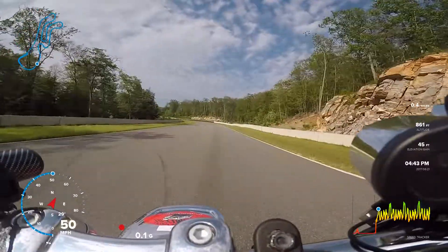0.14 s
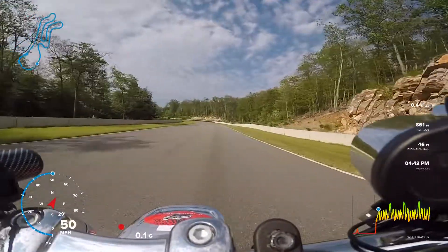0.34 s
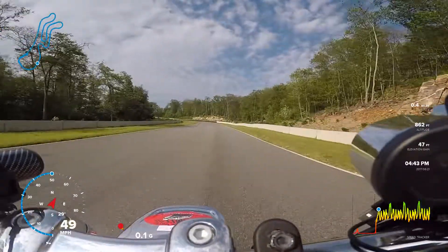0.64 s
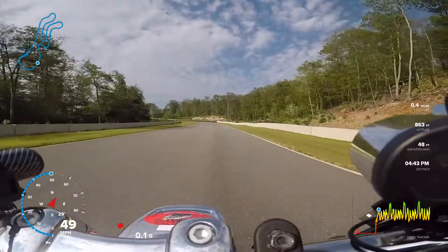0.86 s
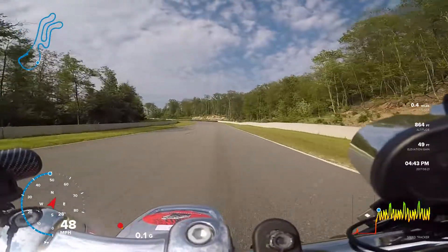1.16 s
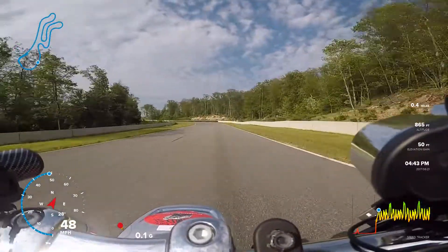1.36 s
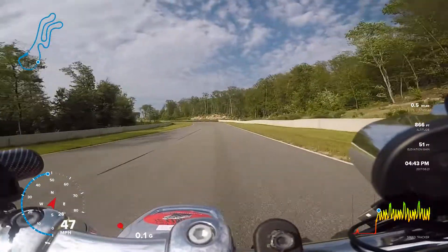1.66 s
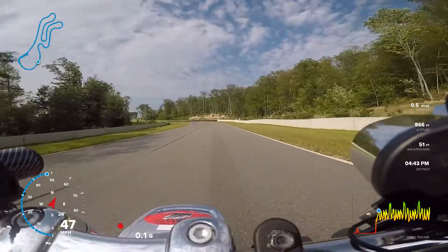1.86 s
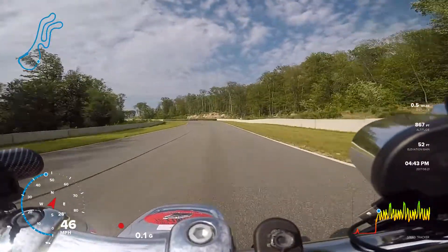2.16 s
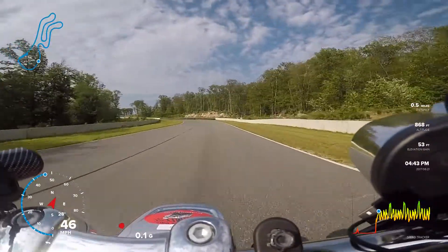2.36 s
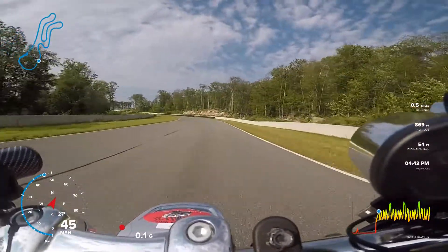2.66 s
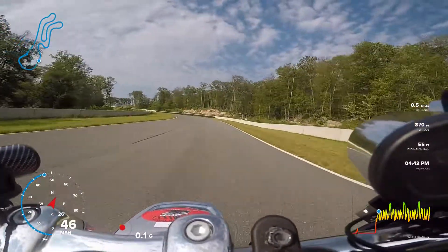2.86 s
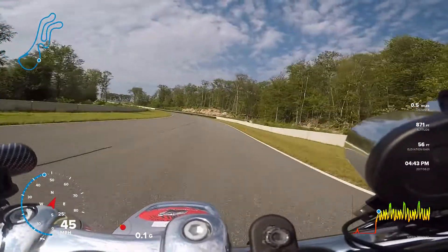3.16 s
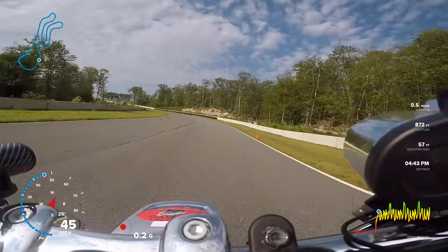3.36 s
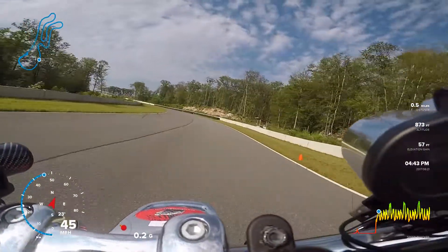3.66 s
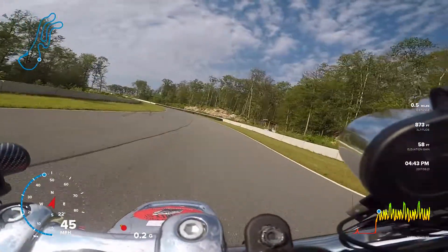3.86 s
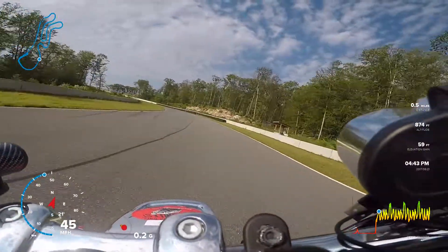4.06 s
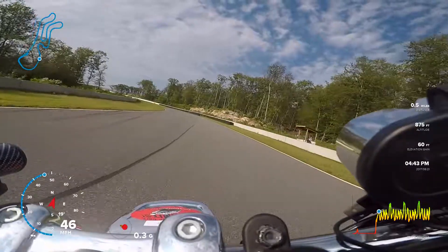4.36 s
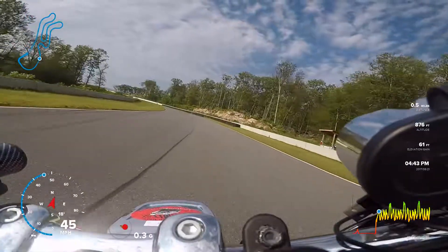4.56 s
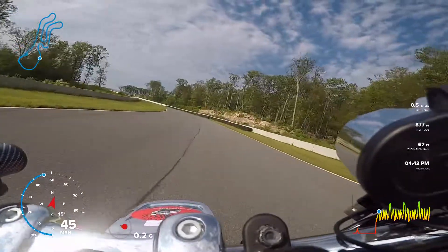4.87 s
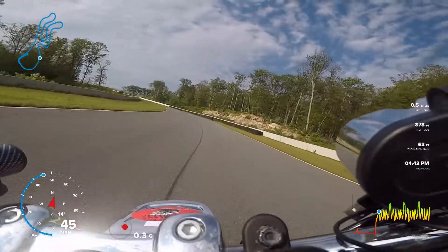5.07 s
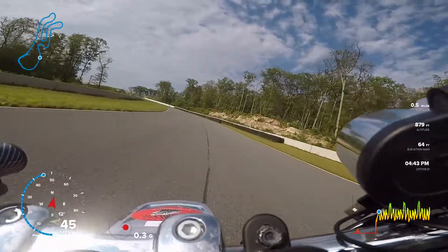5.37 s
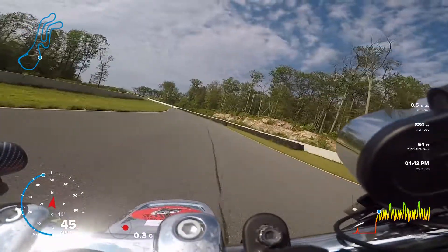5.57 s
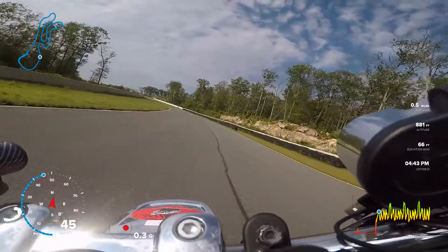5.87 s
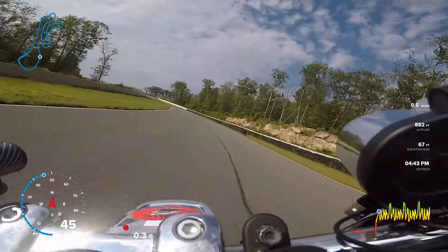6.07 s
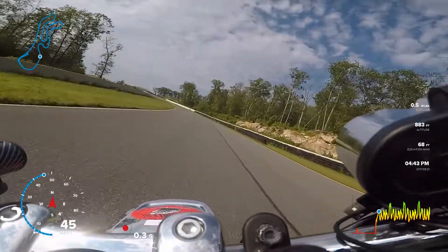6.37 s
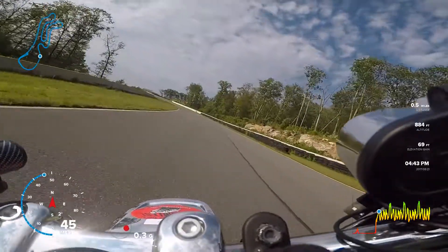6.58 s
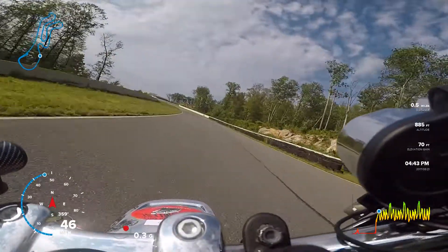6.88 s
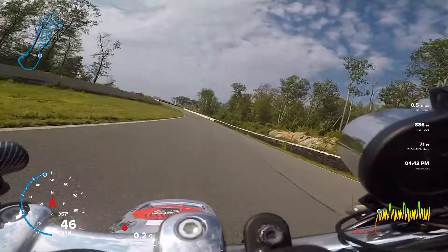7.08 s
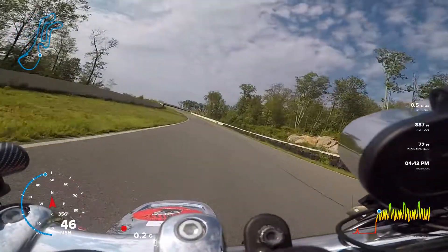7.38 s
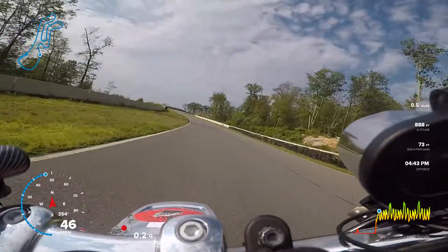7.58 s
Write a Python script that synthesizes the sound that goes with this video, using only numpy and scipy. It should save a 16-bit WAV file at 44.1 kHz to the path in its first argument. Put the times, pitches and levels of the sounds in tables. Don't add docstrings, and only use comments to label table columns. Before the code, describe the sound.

A twin-cylinder motorcycle engine drones low, sinking slightly as it coasts, then pulls gently through a bend under wind buffeting, tyre hum and brief flutter.

```python
import sys
import numpy as np
from scipy import signal
from scipy.fft import rfft, irfft, next_fast_len
from scipy.io import wavfile
from scipy.ndimage import uniform_filter1d, map_coordinates

SR = 44100
rng = np.random.default_rng(int(sys.argv[2]) if len(sys.argv) > 2 else 0)


def materialize(psi):
    bounded = np.clip(np.atleast_2d(psi).T, -1, 1)
    quanta = np.round(bounded * 32767).astype(np.int16)
    wavfile.write(sys.argv[1], SR, quanta)


def undo_db(level):
    steps = np.asarray(level, float) / 20
    return 10 ** steps


N = 340893

# [t/s, crank shake level/dB, frame drone level/dB, throttle opening 0-1]
ENGINE_LOAD = [(0, -24.5, -37, 0.13), (.45, -24, -31.5, 0), (.9, -24, -36.5, 0), (1.25, -21, -32, 0.1),
               (1.6, -21.5, -37, 0.03), (1.95, -31, -40, 0.1), (2.4, -31.5, -35, 0), (3, -24.5, -38, 0.96),
               (3.35, -38, -34, 1), (3.7, -27, -45, 0.7), (4.05, -30, -35.5, 0.92), (4.75, -30, -41, .95),
               (5.15, -28, -49, .95), (5.65, -35, -50, 1), (6.2, -27.5, -38, 0.77), (6.85, -28, -31.5, .9),
               (7.2, -23, -30, 0.7), (7.73, -23.5, -37.5, 0.7)]
# [t/s, four-stroke cycle rate f/Hz]
CYCLE_RATE = [(0, 27.05), (.7, 26.85), (1.05, 26.62), (2.1, 25.42), (2.8, 24.88), (3.2, 24.74),
              (3.85, 24.82), (4.55, 24.94), (5.3, 24.78), (5.95, 24.88), (6.65, 25.13), (7, 25.16),
              (7.73, 25.41)]
# [shut level/dB, open level/dB]
DRONE_ORDERS = [3, 4, 4.39, 5, 13, 14]
DRONE_LEVELS = [(-7, 3.5), (3, 1.5), (5, -10.5), (-6, -1), (-11, -4), (-15.5, -7)]
# [shut level/dB, open level/dB]
EXHAUST_ORDERS = [1, 6, 7, 9, 10, 11, 12, 13]
EXHAUST_LEVELS = [(-46, -42.5), (-40, -27.5), (-55.5, -30.5), (-47.5, -46.5), (-45.5, -49), (-38.5, -61.5),
                  (-46, -44), (-52, -50.5)]
# [t/s, tread tone level/dB]
LEAN = [(0, -47.5), (1.5, -44), (1.85, -33.5), (2.2, -29), (2.7, -31.5), (3.0, -27), (3.6, -25.5),
        (3.8, -20), (4.0, -16.5), (4.25, -18), (5.0, -14), (5.3, -13.5), (5.8, -19), (6.0, -19),
        (6.25, -27), (6.5, -23.5), (7.0, -24.5), (7.73, -26)]
# [t/s, level/dB]
TREAD_OCTAVE = [(0, -56), (2.8, -52), (3.7, -44), (4.7, -36.5), (7.25, -35), (7.4, -48), (7.73, -50)]
# [t/s, level/dB]
HEADWIND = [(0, -20), (.6, -24), (1.2, -25), (1.8, -25), (2.3, -24.5), (2.8, -22.5), (3.4, -22.5),
            (3.75, -28), (4.2, -30.5), (4.55, -29), (5.05, -32), (5.6, -32), (5.9, -28.5), (6.4, -26),
            (6.9, -24), (7.15, -26.5), (7.45, -24.5), (7.73, -29.5)]
# [t/s, level/dB]
ASPHALT = [(0, -36.5), (.45, -33.5), (1, -35), (1.7, -34), (2.1, -31.5), (2.75, -30.5), (3.2, -31.5),
           (3.6, -29.5), (3.83, -29), (3.95, -33), (4.35, -32), (5.05, -33.5), (5.4, -35.5), (5.9, -36.5),
           (6.5, -30), (6.9, -28), (7.2, -30.5), (7.73, -30.5)]
# [t/s, level/dB]
DRAUGHT = [(0, -52), (.4, -51.5), (1.3, -53), (1.8, -52.5), (2.3, -52), (2.6, -52), (2.9, -48.5),
           (3.249, -51.5), (3.55, -49.5), (4.1, -51), (4.9, -50.5), (5.7, -51), (6.101, -49), (6.46, -47),
           (6.75, -49), (7.1, -48.5), (7.73, -50.5)]
# [f/Hz, spectral level/dB]
BUFFET_SPECTRUM = [(15, -40), (27, -10), (33, -4), (41, -1.5), (52, -6), (66, -3), (85, -2.5), (120, -.5),
                   (140, -4), (170, -16), (260, -40)]
THRUM_SPECTRUM = [(100, -31.5), (130, -4.5), (170, 4.5), (225, 2), (240, -16), (300, -34.5)]
ROAR_SPECTRUM = [(150, -14.5), (230, -0.5), (400, -3.5), (590, -3), (800, -9.5), (950, -13), (1500, -13),
                 (2200, -23.5), (4000, -43)]
# [f/Hz, spectral level/dB]
LOW_BAND = [(560, -35), (610, -4), (670, 2.5), (740, -4), (790, -5.5), (815, -27.5)]
MID_BAND = [(900, -22.5), (1020, -4.5), (1180, 3.5), (1240, -1), (1290, -9.5), (1430, -1.5), (1580, -4),
            (1800, -8), (2100, -21)]
HIGH_BAND = [(1590, -25), (1630, -6), (1660, -5), (1690, -1), (1710, 0), (1730, -3), (1755, -22)]
# [f/Hz, spectral level/dB]
HISS_SPECTRUM = [(1200, -27.5), (1900, -1), (2200, -7.5), (2480, -3.5), (2700, -6.5), (3600, -5),
                 (4050, -11), (5000, -15.5), (7000, -26)]
SIZZLE_SPECTRUM = [(3500, -23), (4300, -2.5), (5000, -2.5), (6100, -3.5), (6300, -1), (6650, -3),
                   (6900, -7), (7400, -12), (8600, -19), (9800, -33), (11500, -52)]
# [mean level/dB, then slope in dB per dB of headwind, of asphalt, of draught]
BUFFET_LAW = (-26, 0.52, .05, -0.3)
ROAR_LAW = (-32.5, .3, .3, 0.36)
LOW_LAW = (-34.5, .05, 1.1, 0.03)
MID_LAW = (-37, .4, .2, -0.2)
HIGH_LAW = (-44.5, .1, .2, 0.8)
HISS_LAW = (-46, .4, .1, .5)
SIZZLE_LAW = (-53, -0.04, -0.04, 1.65)
# [t/s, f/Hz, peak level/dB]
FLAPS = [
    (5.06, 157, -14),
    (5.34, 180, -21),
    (5.39, 220, -15),
    (5.455, 150, -14),
    (5.52, 222, -16),
    (5.575, 190, -15),
    (5.615, 176, -18),
    (5.67, 152, -14),
    (5.775, 160, -22),
]
# [t/s, half length/s, rise level/dB]
SINGING = [
    (2.502, 0.77, 6),
    (4.052, 0.22, 4),
    (6.443, .4, 4.5),
]

SECOND_FIRING = 315 / 720
BLOCKS_PER_CYCLE, BLOCKS_DRIFT_PER_S = 8.172, -.0145
THRUM_DB, THRUM_FOLLOWS, THRUM_GUST_DB = -37, .36, 8
FLAP_S, FLAP_SAG_HZ_PER_S = .024, 150
GUST_S, GUST_LAG_S, FULL_PUSH_DB, GUST_MASKS_DB = .024, .012, -17, 20
GUST_S = .034


def unit(x):
    return x / np.sqrt(np.mean(x ** 2) + 1e-20)


def curves(rows):
    s, *cols = np.transpose(rows)
    return [np.interp(np.arange(N) / SR, s, c) for c in cols]


def wobble(rate):
    t = np.arange(0, N + 64, 64) / SR
    knots = rng.standard_normal(int(N / SR * 50))
    curve = map_coordinates(knots, [t * np.clip(rate, .1, 45)])
    return np.interp(np.arange(N) / SR, t, curve)


def coloured(x, spectrum):
    size = next_fast_len(N + 8192)
    hz, db = np.transpose(spectrum)
    bins = np.fft.rfftfreq(size, 1 / SR)
    gain = undo_db(np.interp(np.log(bins + 1), np.log(hz + 1), db, -120, -120))
    return unit(irfft(rfft(x, size) * gain, size)[:N])


def rush(spectrum, patchy_db):
    z = signal.stft(rng.standard_normal(N + 1024), nperseg=512)[2]
    field = uniform_filter1d(rng.standard_normal(z.shape), size=5, axis=0)
    field = uniform_filter1d(field, size=10, axis=1)
    patchy = signal.istft(z * undo_db(patchy_db * unit(field)), nperseg=512)[1]
    return coloured(patchy[:N], spectrum)


def tone(turns, flutter_db, rate):
    level = np.sqrt(2) * undo_db(flutter_db * wobble(rate))
    return level * np.sin(2 * np.pi * (turns + rng.random()))


def law(rule, weather):
    return rule[0] + np.dot(rule[1:], weather)


def air(cycles, weather):
    hiss_db = law(HISS_LAW, weather) + 2.0
    sizzle_db = law(SIZZLE_LAW, weather) + 1.5
    clatter = undo_db(0.18 * wobble(11.0) + .45 * wobble(5.4))
    clatter = clatter * (1 + .05 * np.cos(2 * np.pi * cycles))
    hiss = undo_db(hiss_db) * rush(HISS_SPECTRUM, patchy_db=0.9)
    sizzle = undo_db(sizzle_db) * rush(SIZZLE_SPECTRUM, patchy_db=1.1)
    return clatter * (hiss + sizzle)


def crosswind():
    t = np.arange(0, N / SR, .002)
    push = sum(undo_db(db - FULL_PUSH_DB) * np.exp(-((t - s - GUST_LAG_S) / GUST_S) ** 2)
               for s, _, db in FLAPS)
    return np.interp(np.arange(N) / SR, t, np.tanh(push))


def flaps(rag):
    out = np.zeros(N)
    t = np.arange(-SR // 10, SR // 10) / SR
    swell = np.exp(-(t / FLAP_S) ** 2)
    for s, hz, db in FLAPS:
        at = slice(round(s * SR), round(s * SR) + len(t))
        turns = hz * t - FLAP_SAG_HZ_PER_S * t ** 2 / 2
        note = np.sqrt(2) * np.sin(2 * np.pi * (turns + rng.random()))
        out[at] += undo_db(db) * swell * (note + rag[at])
    return np.roll(out, -SR // 10)


def wind(weather, gust):
    lean_db, = curves(LEAN)
    buffet_db = law(BUFFET_LAW, weather) + 2.0 + 0.92 * wobble(6.1)
    buffet = undo_db(buffet_db) * rush(BUFFET_SPECTRUM, patchy_db=0.56)
    thrum_db = THRUM_DB + THRUM_FOLLOWS * (lean_db - lean_db.mean()) + THRUM_GUST_DB * gust
    thrum = undo_db(thrum_db + 5.5 + 1.8 * wobble(7.3)) * rush(THRUM_SPECTRUM, patchy_db=-3.5)
    roar_db = law(ROAR_LAW, weather) + 2.0 + 0.82 * wobble(6)
    roar = undo_db(roar_db) * rush(ROAR_SPECTRUM, patchy_db=1.0)
    rag = .3 * rush(THRUM_SPECTRUM, patchy_db=1.1)
    return buffet + thrum + roar + flaps(rag)


def firings(cycles, scatter_db, rattle_s):
    front = np.diff(np.floor(cycles), prepend=0)
    rear = np.diff(np.floor(cycles + 1 - SECOND_FIRING), prepend=0)
    t = np.arange(SR // 10) / SR
    rattle = rng.standard_normal(len(t)) * undo_db(-60 * t / rattle_s)
    strength = undo_db(scatter_db * rng.standard_normal(N))
    return signal.fftconvolve((front + 0.71 * rear) * strength, rattle)[:N]


def mount(cycles, weather):
    blows = firings(cycles + .002 * wobble(20), scatter_db=0.5, rattle_s=.09)

    def ring(band, firing_share, rule):
        drive = rush(band, patchy_db=1.54) + firing_share * coloured(blows, band)
        return undo_db(law(rule, weather)) * drive

    t = np.arange(0, N / SR, .01)
    rise_db = sum(db * np.exp(-((t - s) / half) ** 2) for s, half, db in SINGING)
    sing_db = np.interp(np.arange(N) / SR, t, rise_db)
    low = ring(LOW_BAND, 0.55, LOW_LAW)
    mid = ring(MID_BAND, 0.26, MID_LAW)
    return low + mid + undo_db(sing_db) * ring(HIGH_BAND, 0.74, HIGH_LAW)


def tyre(blocks, gust):
    lean_db, = curves(LEAN)
    octave_db, = curves(TREAD_OCTAVE)
    blocks = blocks + .008 * wobble(8)
    tread = undo_db(lean_db - GUST_MASKS_DB * gust) * tone(blocks, flutter_db=.6, rate=9)
    octave = undo_db(octave_db) * tone(2 * blocks, flutter_db=1.2, rate=6)
    return tread + octave


def orders(multiples, levels, cycles, throttle):
    return sum(undo_db(shut + (wide - shut) * throttle) * tone(k * cycles, flutter_db=-0.8, rate=5.4)
               for k, (shut, wide) in zip(multiples, levels))


def engine(cycles):
    crank_db, drone_db, throttle = curves(ENGINE_LOAD)
    throttle = np.clip(throttle, 0, 1)
    crank = undo_db(crank_db) * tone(2 * cycles, flutter_db=0.8, rate=8.8)
    drone = undo_db(drone_db) * orders(DRONE_ORDERS, DRONE_LEVELS, cycles, throttle)
    exhaust = orders(EXHAUST_ORDERS, EXHAUST_LEVELS, cycles, throttle)
    return crank + drone + exhaust


def scene():
    hz, = curves(CYCLE_RATE)
    cycles = np.cumsum(hz) / SR
    blocks_per_cycle = BLOCKS_PER_CYCLE + BLOCKS_DRIFT_PER_S * np.arange(N) / SR
    blocks = np.cumsum(hz * blocks_per_cycle) / SR
    weather = np.array([db - db.mean() for db, in map(curves, (HEADWIND, ASPHALT, DRAUGHT))])
    gust = crosswind()
    mix = engine(cycles) + tyre(blocks, gust) + wind(weather, gust)
    mix = mix + mount(cycles, weather) + air(cycles, weather)
    return mix[None]


def squeezed(x):
    level = np.sqrt(np.abs(uniform_filter1d(x ** 2, size=900)) + 1e-9)
    return x * (1 + (level / undo_db(-21.0)) ** 4) ** (-.14) * undo_db(2.0)


def band_limit(x):
    return signal.sosfilt(signal.butter(12, 11500, fs=SR, output="sos"), x)


def record(dry):
    crossover = signal.butter(2, 500, fs=SR, output="sos")
    low = signal.sosfiltfilt(crossover, dry)
    high = dry - low
    low = squeezed(low)
    excess = (1 + np.abs((low + high) / 0.4) ** 6) ** (1 / 6)
    return band_limit(low / excess + high)


dry = scene()
out = record(dry)
materialize(out)
```